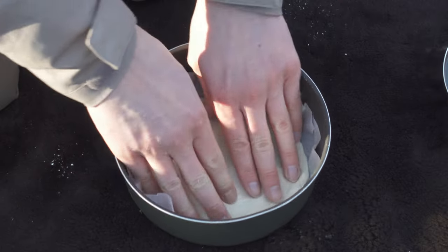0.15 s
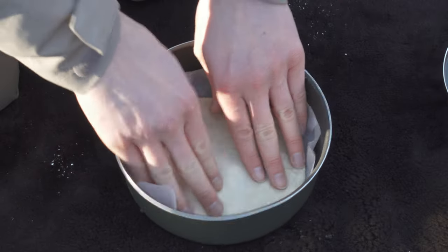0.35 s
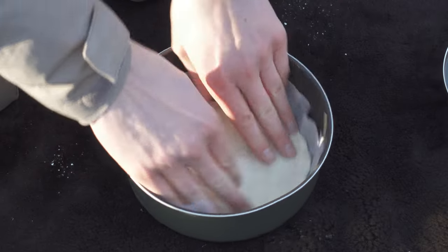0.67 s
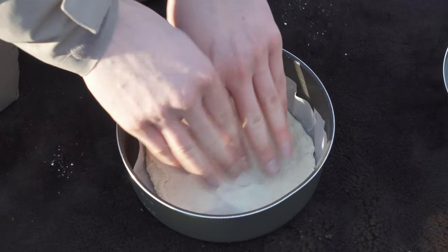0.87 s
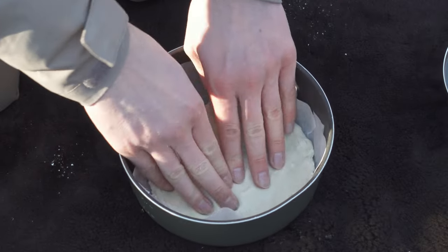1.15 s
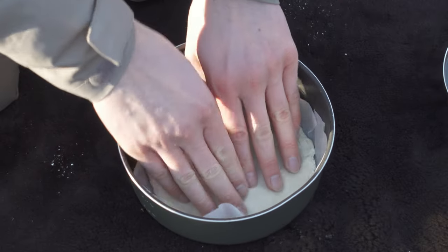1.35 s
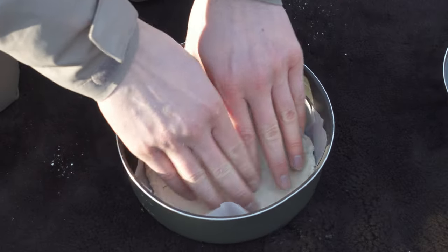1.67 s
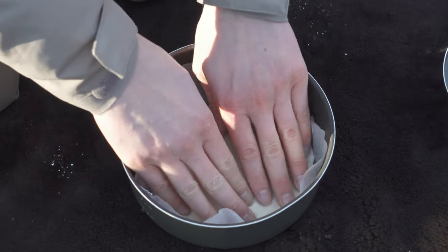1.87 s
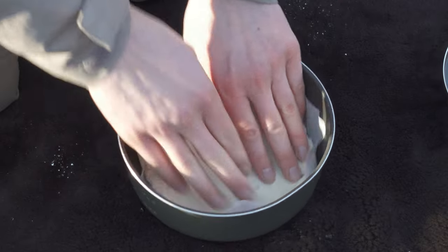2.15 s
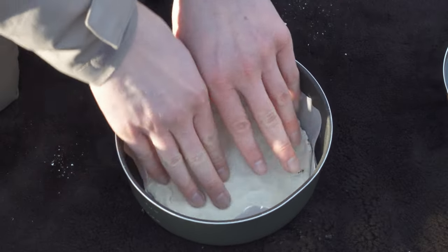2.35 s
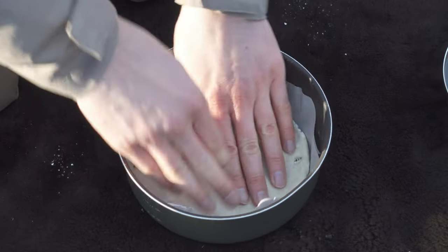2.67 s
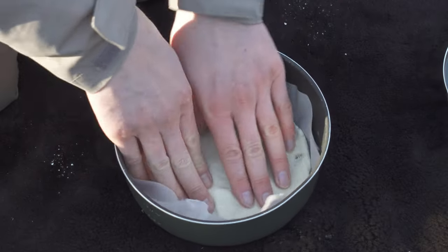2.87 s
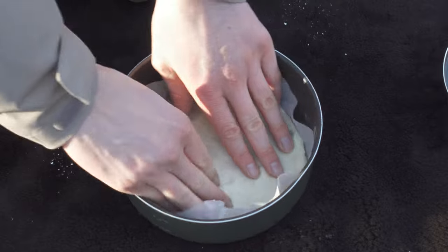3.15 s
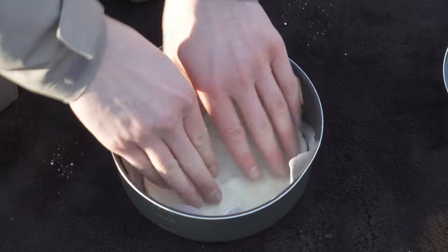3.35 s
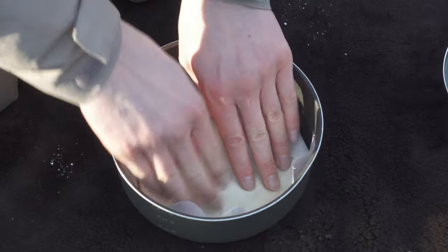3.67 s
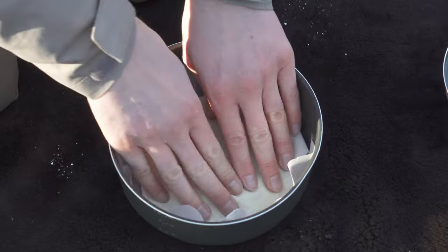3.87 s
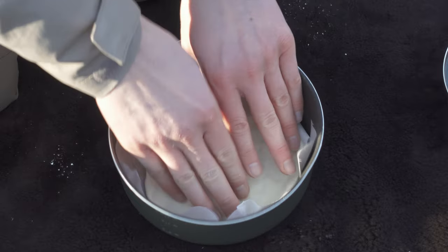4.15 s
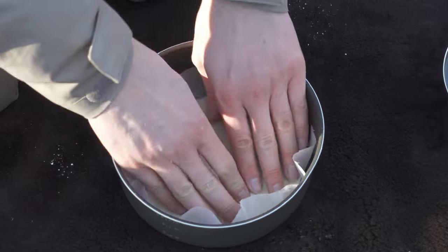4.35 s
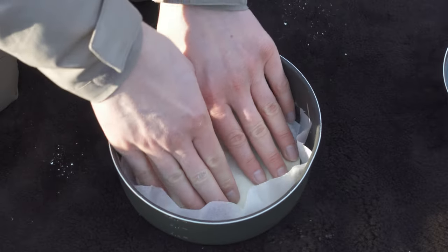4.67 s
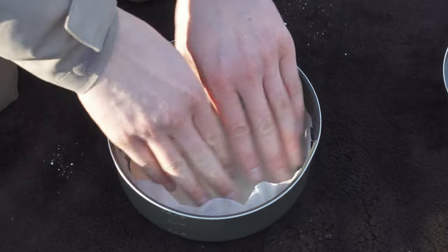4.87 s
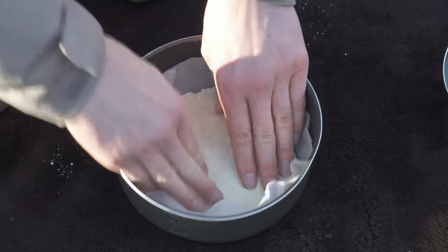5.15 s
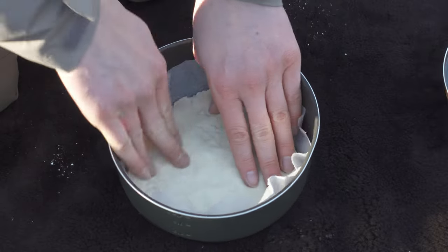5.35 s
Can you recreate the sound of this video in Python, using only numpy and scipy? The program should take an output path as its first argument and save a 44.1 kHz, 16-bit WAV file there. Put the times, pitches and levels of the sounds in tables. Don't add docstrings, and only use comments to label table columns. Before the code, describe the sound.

Baking paper crinkles, flicks and pops inside a shallow tin, giving it a slightly hollow, metallic colour. Early rustling and snaps thin out into quieter movement, one knock stands out around 2.2 seconds, then brisk crackling returns and peaks around five seconds with a heavy short thud. Close, dry, mono outdoor pickup with faint breeze and smooth hiss behind.

```python
import sys
import numpy as np
from scipy import signal
from scipy.io import wavfile
from scipy.ndimage import uniform_filter1d

SR = 44100
rng = np.random.default_rng(int(sys.argv[2]) if len(sys.argv) > 2 else 0)


def master_out(mix):
    frames = np.transpose(np.atleast_2d(mix))
    ceiling = np.clip(frames, -1, 1)
    pcm = np.round(ceiling * 32767).astype(np.int16)
    wavfile.write(sys.argv[1], SR, pcm)


def linear_from_db(decibels):
    return 10 ** (np.asarray(decibels, float) / 20)


N = 243520

# peak t/s, level/dB, rise/(ms per 10 dB), fall/(ms per 10 dB)
PUSHES = [(0.088, -37, 101, 61), (0.266, -35.5, 57, 77), (0.485, -35.5, 63, 62), (0.692, -26, 65, 164),
          (1.309, -51.5, 164, 199), (1.67, -43, 38, 31), (2.204, -31.5, 127, 75), (2.492, -41.5, 156, 61),
          (2.669, -33.5, 63, 35), (2.822, -32.5, 33, 35), (2.982, -32, 50, 36), (3.149, -32, 40, 60),
          (3.29, -30, 67, 19), (3.338, -27.5, 54, 63), (3.615, -41, 104, 39), (3.707, -34, 34, 19),
          (3.89, -44, 72, 142), (4.059, -35, 61, 34), (4.174, -38, 142, 17), (4.241, -36.5, 40, 28),
          (4.55, -30.5, 84, 16), (4.807, -38, 168, 34), (4.912, -25.5, 62, 19), (4.975, -25.5, 33, 65),
          (5.095, -30.5, 22, 30), (0.93, -53.5, 64, 77), (5.245, -27.5, 46, 27), (5.527, -38.5, 167, 202)]
# t/s, level/dB, rise and fall/(ms per 10 dB)
FLICKS = [(0.34, -34, 18), (0.384, -38, 17), (0.438, -33.5, 13), (1.452, -32.5, 17), (1.508, -47, 27),
          (1.549, -49, 20), (1.739, -42, 23), (1.773, -42, 14), (3.404, -23.5, 7), (3.446, -34, 18.5),
          (3.891, -47, 28), (4.393, -33, 30.5), (4.648, -31, 12), (5.055, -19, 13.5), (5.152, -29.5, 23.5),
          (5.357, -42.5, 34)]
# t/s, level/dB, fall/(ms per 10 dB)
RELEASES = [(0.634, -32.5, 107), (1.036, -40.5, 73), (1.865, -40, 70), (1.925, -44, 73), (2.559, -41, 22),
            (2.714, -35.5, 138), (3.029, -33.5, 48), (3.487, -31, 110), (3.744, -39, 67), (4.272, -35, 42),
            (4.325, -35.5, 20), (5.042, -31, 83)]
# t/s, level/dB, rise/(ms per 10 dB)
PULLS = [
    (0.567, -35.5, 18),
    (0.848, -33, 16),
    (2.323, -36.5, 42),
    (4.65, -38, 92),
    (5.472, -39.5, 78),
]
HALTS = [0.153, 0.869, 3.012, 3.412, 3.535, 5.068, 5.298]
# t/s, level/dB
SEATING = [(0, -10.5), (0.3, -9.5), (0.7, -15.5), (1.1, -6.5), (1.65, -17.5), (1.9, -6.5), (2.6, -14),
           (3.05, -6.5), (3.4, -18), (3.8, -7.5), (4.3, -6.5), (4.7, -9), (5.1, -6.5), (5.52, -9.5)]
# t/s, level/dB
CUPPING = [(0, -7), (0.15, -1), (0.3, 3), (0.45, -6), (0.75, 5), (1.0, -14), (1.4, 0), (2.0, -2),
           (2.3, -10), (2.6, -12), (3.0, -10), (3.17, -7), (3.27, 9), (3.39, 0), (3.5, -24), (4.0, -7),
           (4.4, -17), (5.15, 0)]
# f/Hz, density/dB
RUSTLE_SPECTRUM = [(180, -89), (300, -7.5), (535, -7), (808, -6.5), (1510, -4.5), (1870, 1), (2690, 6),
                   (3940, 2), (6360, -3), (8010, -8), (9760, -7), (12100, -3.5), (15500, -12.5)]
# f/Hz, width/Hz, level/dB
HOLLOW = [(826, 233, 8), (1228, 156, 4.5), (1860, 320, -4), (2940, 64, 1), (3670, 94, -15),
          (8160, 1520, 19.5), (12700, 730, -42)]
# f/Hz, width/Hz, share cancelled/1
WALL_DIPS = [(6450, 410, 0.28), (9770, 4900, 0.72)]
# f/Hz, density/dB
AIR_SPECTRUM = [(15, -30), (25, 8), (77, 1), (457, -13), (848, -13.5), (1530, -18.5), (1900, -20.5),
                (3930, -17.5), (8350, -19), (10100, -18), (12800, -21), (15500, -27)]
# t/s, peak/dB, ring f/Hz, treble/dB
CRACKS = [(0.0548, -9.5, 5200, -1), (0.1479, -5.5, 2710, -5.5), (0.4466, -12, 1890, -4),
          (0.4913, -6.5, 1980, -6), (0.5043, -11, 1890, -4), (1.4471, -14.5, 2090, -23),
          (1.8727, -18, 4630, -1), (1.925, -12, 2840, -4), (1.9394, -6.5, 3950, 3), (2.159, -16, 3030, -7),
          (2.176, -14, 7800, 4), (3.278, -8, 3670, -3), (3.4533, -12, 3570, -12), (3.603, -14, 4800, 4),
          (3.632, -17, 4130, 0), (4.0527, -9, 3600, 3), (4.061, -18, 3670, -8), (4.2673, -8.5, 2020, -1),
          (4.28, -13.5, 3230, -15), (4.433, -15, 3600, -11), (4.6744, -7, 4770, 8),
          (5.467, -11.5, 7300, -3), (5.478, -14, 7850, 10), (5.5052, -11, 2060, -10),
          (5.5155, -5, 7700, -9)]
# t/s, peak/dB, ring f/Hz, treble/dB
FULL_SNAPS = [(0.3424, -14, 1900, -14), (0.463, -10, 4570, -6), (0.471, -14, 6570, -13),
              (0.4767, -9.5, 7150, -4), (0.486, -12, 3980, -16), (0.7556, -4.5, 4120, -3),
              (1.038, -22, 2560, -11), (1.8594, -8.5, 1950, -7), (1.864, -8.5, 11800, -3),
              (1.921, -18, 5920, -8), (2.2205, -13.5, 2040, -8), (3.111, -11, 3100, -1),
              (3.485, -7.5, 3520, 0), (3.5172, -6.5, 1980, 13), (3.53, -9.5, 4020, -7),
              (3.6455, -14, 4480, -7), (3.7059, -12, 2050, -11), (4.235, -14, 5000, -1),
              (4.386, -6.5, 8650, -15), (5.042, -4, 2380, -13), (5.114, -12.5, 2280, -22),
              (5.2522, -11, 2100, -3), (5.272, -11.5, 3170, -7), (5.4335, -18, 2070, -8)]
# t/s, peak/dB, ring f/Hz
TICKS = [(0.072, -21, 7300), (0.272, -16.5, 4200), (0.385, -20.5, 4820), (0.537, -15, 6300),
         (0.692, -10, 7100), (0.841, -11, 8900), (2.388, -18, 4760), (2.415, -21, 4470), (3.062, -31, 2220),
         (3.15, -21, 2200), (3.329, -2, 11400), (3.935, -20, 9900), (4.5977, -17, 7400), (4.765, -22, 3700),
         (5.145, -7, 7900)]
# t/s, peak/dB, ring f/Hz, low/dB
CRUNCHES = [(0.6693, -8, 3040, -12), (0.816, -15, 1760, 13), (1.884, -19.5, 6980, 5), (3.017, -23, 2420, 2),
            (3.0794, -30, 2800, 10), (3.264, -18, 2000, 6), (3.286, -11.5, 4370, 1), (3.403, -7, 2840, -17),
            (3.475, -13, 3530, 11), (3.9707, -22, 4450, 4), (4.162, -17.5, 2220, 12),
            (4.399, -15, 2280, -12), (4.6354, -17, 2090, 13), (4.909, -14, 2600, -14),
            (4.928, -16, 3360, 12), (4.9704, -10, 3720, -2), (4.998, -11, 3840, -15),
            (5.0098, -13, 3080, -14), (5.061, -2, 4880, -25), (5.1042, -20, 2500, -3),
            (5.2334, -13.5, 1980, 13), (5.2888, -15.5, 5100, 9)]
# t/s, peak/dB
CLICKS = [
    (0.8665, -9),
    (3.5057, -4),
    (5.0485, -1),
    (5.142, -19),
    (3.4025, 2),
    (1.632, -25),
    (2.862, -25),
    (2.2212, -14),
]
# t/s, peak/dB, ring f/Hz
PIPS = [(0.043, -26, 1800), (0.374, -24, 1900), (1.311, -31, 2400), (1.731, -29, 2190), (1.78, -30.5, 1950),
        (2.057, -28, 1840), (2.46, -24, 2580), (4.21, -26, 2900), (5.156, -12.5, 2430), (5.163, -17, 2550),
        (5.36, -27, 2420), (2.555, -24, 1100), (2.135, -24.5, 1260), (4.531, -29, 2000)]
# t/s, peak/dB, ring f/Hz
SLIPS = [(0.039, -27, 2890), (0.0785, -21, 7880), (0.216, -31, 1200), (0.244, -26, 7700),
         (0.286, -29, 7750), (0.564, -21, 1820), (1.9013, -29, 8440), (1.9043, -27, 8310),
         (1.9482, -35, 2780), (1.9776, -26, 5640), (2.0135, -38, 7800), (2.5054, -26, 7920),
         (2.5373, -29, 2280), (2.6226, -27, 8270), (2.7707, -23, 2760), (3.0788, -14, 2570),
         (3.138, -22, 2040), (3.29, -16, 4400), (3.5016, -20, 8310), (3.7935, -24, 1850),
         (4.207, -29, 1810), (4.23, -24, 4220), (4.696, -27, 8100), (4.7004, -26.5, 4600),
         (4.7563, -37, 7880), (4.9324, -22, 2580), (0.577, -31, 8100), (3.4765, -22, 8250),
         (0.3, -24, 1550), (0.334, -19, 2000), (1.051, -27, 4300), (1.072, -30, 2500), (1.287, -31, 2600),
          (1.55, -25, 3220), (1.652, -29, 3360), (2.0937, -21, 2540), (2.1398, -21, 7800),
          (2.586, -29, 3620), (2.73, -25, 3000), (3.0616, -28, 8550), (3.785, -29, 1340),
          (3.862, -32, 1510), (4.2486, -21, 7880), (4.913, -9.5, 3400), (4.9863, -15, 7880),
          (5.039, -10, 4000), (5.472, -21, 3660), (3.502, -21, 5000)]
# from f/Hz, to f/Hz
SNAP_BANDS_HZ = [(1150, 2600), (2600, 6000), (6000, 15500)]
# f/Hz, width/Hz
TIN_MODES = [(1900, 170), (2470, 150), (2950, 150), (3550, 170), (4080, 170)]
# t/s, peak/dB, low f/Hz, middle f/Hz, high f/Hz
FACETS = [(0.0548, -12, 2900, 3700, 8420), (0.1468, -6, 2640, 4770, 8300), (0.4462, -9, 1990, 5460, 8170),
          (0.4625, -8, 2900, 4580, 8670), (0.4772, -9, 2500, 6030, 7110), (0.4909, -6, 1920, 4500, 7200),
          (0.5037, -21, 1880, 4490, 8090), (0.7559, -5, 1920, 3920, 7700), (0.8413, -6, 1960, 3620, 8430),
          (1.447, -11, 2150, 4400, 7700), (1.8592, -11, 1990, 5500, 7300), (1.8637, -5, 2400, 5760, 7400),
          (1.9264, -8, 2800, 4400, 7300), (1.94, -13, 2770, 4200, 8000), (3.1099, -7, 2950, 3400, 7370),
          (3.278, -9, 1890, 3590, 8400), (3.3303, -9, 2950, 4650, 8500), (3.4035, 0, 2860, 4170, 8260),
          (3.476, -15, 2940, 3570, 8170), (3.485, -6, 2940, 3500, 8220), (3.5167, -9, 2870, 5030, 8000),
          (3.531, -8, 2860, 4900, 7560), (3.7064, -7, 1900, 3930, 7700), (4.0532, -10, 1970, 3620, 8150),
          (4.267, -5, 2050, 6100, 8000), (4.3866, -9, 2970, 5220, 8600), (4.4334, -14, 3300, 3470, 6300),
          (4.6749, 0, 4400, 4950, 8350), (5.042, 1, 2480, 3700, 8300), (5.0614, -7, 3000, 5100, 7800),
          (5.1447, -7, 2460, 4700, 7460), (5.252, -9, 1920, 3400, 7700), (5.289, -18, 2500, 5370, 7370),
          (5.4672, -22, 2030, 3700, 7660), (5.5155, -7, 2270, 5920, 7700)]
FACET_DB = [-13, -12, -14]
FACET_MS = [12, 11, 10]
# t/s, peak/dB, f/Hz, 60 dB decay/s
KNOCKS = [(0.881, -27, 791, 0.0067), (1.266, -35, 390, 0.02), (1.294, -33, 600, 0.016),
          (1.336, -36, 447, 0.02), (1.005, -39, 700, 0.012), (1.36, -38, 500, 0.018),
          (2.2221, -13.5, 794, 0.01), (2.729, -27.5, 415, 0.011), (3.039, -29, 854, 0.069),
          (3.02, -32, 1010, 0.038), (3.261, -33, 830, 0.047), (3.29, -30, 830, 0.038),
          (3.476, -30, 1150, 0.014), (3.486, -30, 900, 0.015), (3.5055, -27, 800, 0.011),
          (3.5171, -24, 1240, 0.012), (3.521, -32, 700, 0.014), (3.53, -31, 750, 0.014),
          (2.2214, -18, 1480, 0.011), (3.403, -27, 1310, 0.016), (3.706, -23.5, 864, 0.037),
          (4.022, -32, 393, 0.024), (4.161, -28, 900, 0.016), (4.266, -28, 865, 0.022),
          (4.922, -28.5, 860, 0.032), (4.977, -22, 836, 0.033), (5.064, -17, 860, 0.0064),
          (5.213, -28, 750, 0.014), (5.275, -24.5, 720, 0.021), (5.294, -24.5, 860, 0.0091)]
# t/s, peak/dB, f/Hz, 60 dB decay/s
THUDS = [
    (1.022, -28.5, 110, 0.018),
    (1.493, -32, 148, 0.038),
    (4.613, -24, 83.4, 0.014),
    (5.039, -5, 134, 0.0058),
]
# t/s, peak/dB, f/Hz, 60 dB decay/s
MORE_KNOCKS = [(0.249, -36, 330, .03), (0.891, -37, 304, 0.025), (1.026, -31.5, 260, 0.026),
               (1.127, -36, 350, .03), (1.501, -35, 230, 0.025), (1.758, -37, 248, 0.027),
               (3.088, -36.5, 377, .03), (3.111, -28.5, 790, .015), (4.103, -34, 350, .03),
               (4.245, -36, 330, 0.035), (4.836, -31, 353, 0.026), (5.038, -15.5, 325, 0.016),
               (0.464, -30, 860, .015), (4.298, -32, 600, 0.016), (3.705, -29, 380, 0.022)]
# start t/s, end t/s, from f/Hz, to f/Hz, level/dB
GROANS = [(3.79, 3.86, 680, 715, -42), (3.858, 3.912, 715, 705, -35), (3.75, 3.92, 1350, 1260, -45),
          (3.79, 3.92, 1580, 1680, -45), (4.07, 4.15, 1700, 1650, -41), (4.04, 4.13, 900, 780, -44),
          (3.43, 3.47, 3700, 3400, -34), (3.72, 3.79, 1800, 1980, -43), (3.92, 3.97, 740, 600, -46),
          (4.15, 4.24, 1850, 1740, -40), (4.0, 4.06, 1620, 1700, -46), (3.425, 3.455, 5500, 4300, -35)]


def rms_one(x):
    return x / np.sqrt(np.mean(x ** 2) + 1e-20)


def in_time(rows):
    s, *columns = np.transpose(rows)
    return [np.interp(np.arange(N) / SR, s, column) for column in columns]


def at_hz(points, hz):
    points_hz, points_db = np.transpose(points)
    return np.interp(np.log(hz), np.log(points_hz), points_db)


def drift(rate_hz):
    r = np.exp(-16 * np.pi * rate_hz / SR)
    noise = rng.standard_normal(N // 8 + 4002)
    slow = signal.lfilter([1], [1, -2 * r, r * r], noise)[4000:]
    return np.interp(np.arange(N) / 8, np.arange(len(slow)), rms_one(slow))


def resonance(x, hz, width_hz):
    r = np.exp(-np.pi * width_hz / SR)
    zeros = np.array([1, 0, -1]) * (1 - r * r) / 2
    poles = [1, -2 * r * np.cos(2 * np.pi * hz / SR), r * r]
    return signal.lfilter(zeros, poles, x)


def band(x, low_hz, high_hz):
    edges_hz = [low_hz, min(high_hz, .45 * SR)]
    return signal.sosfilt(signal.butter(2, edges_hz, "band", fs=SR, output="sos"), x)


def bands(low_hz, per_octave, count):
    edges = low_hz * 2 ** (np.arange(count + 1) / per_octave)
    return zip(edges, edges[1:], np.sqrt(edges[:-1] * edges[1:]))


def hollow(x, lift_db):
    x = x + sum(linear_from_db(lift_db + db) * resonance(x, hz, width_hz) for hz, width_hz, db in HOLLOW)
    for hz, width_hz, share in WALL_DIPS:
        x = x - np.clip(share, 0, 1) * resonance(x, hz, width_hz)
    return x


def strokes():
    let_go_ms, stop_ms = 11, 10
    halt_db_per_ms = 1.5
    body_loss_per_db = 0.4
    rows = [(s, db, rise, fall, 1) for s, db, rise, fall in PUSHES]
    rows += [(s, db, ms, ms, 1) for s, db, ms in FLICKS]
    rows += [(s, db, let_go_ms, fall, 1.5) for s, db, fall in RELEASES]
    rows += [(s, db, rise, stop_ms, 3) for s, db, rise in PULLS]
    s, db, rise_ms, fall_ms, treble_db = np.transpose(rows)[:, :, None]
    t = np.arange(0, N + 32, 32) / SR
    slope_s = np.maximum(np.where(t < s, rise_ms, fall_ms) / 1000, .003)
    away = np.abs(t - s) / slope_s
    halted_ms = sum(1000 * np.maximum(t - halt, 0) * (s < halt) for halt in HALTS)
    power = linear_from_db(2 * (db - 10 * away ** 1.5 - halt_db_per_ms * halted_ms)) + 1e-12
    total = power.sum(axis=0)
    coarse = np.sqrt(total), (power * treble_db).sum(axis=0) / total, (power * db).sum(axis=0) / total
    force, treble_db, effort_db = [np.interp(np.arange(N) / SR, t, c) for c in coarse]
    body_db = in_time(SEATING)[0] - body_loss_per_db * (effort_db + 33)
    return force, treble_db, body_db


def rustle(slips_per_s, spread_db, clump_db, patch_db):
    body_hz, middle_hz, treble_hz = 750, 2900, 9500
    force, treble_db, body_db = strokes()
    spread = linear_from_db(spread_db * np.minimum(rng.exponential(1, (2, N)), 4.5))
    sizes = spread * rng.standard_normal((2, N))
    slips = sizes * (rng.random((2, N)) < slips_per_s / SR)
    out = 0
    for k, (low, high, hz) in enumerate(bands(263.0, 5, count=30)):
        to_body = np.clip(np.log(middle_hz / hz) / np.log(middle_hz / body_hz), 0, 1)
        to_treble = np.clip(np.log(hz / middle_hz) / np.log(treble_hz / middle_hz), 0, 1)
        colour_db = at_hz(RUSTLE_SPECTRUM, hz) + to_body * (body_db + 15.5) + to_treble * treble_db
        lone = np.roll(sizes[k % 2], 997 * k) * (rng.random(N) < 60 / SR)
        pops = linear_from_db(8.5 - 8.0 * to_body) * lone
        out = out + linear_from_db(colour_db + patch_db * drift(19.0)) * band(slips[k % 2] + pops, low, high)
    out = out + linear_from_db(in_time(CUPPING)[0]) * resonance(out, hz=1890, width_hz=120)
    clumps = linear_from_db(1.37 + clump_db * drift(68))
    return force * clumps * rms_one(hollow(out, lift_db=-5.5))


def air(level_db, gust_db):
    white = rng.standard_normal((2, N + SR))
    out = 0
    for k, (low, high, hz) in enumerate(bands(17.26, 3, count=30)):
        lumps_db = gust_db * np.clip(np.log(900 / hz), 0, .9) * drift(9.2)
        out = out + linear_from_db(at_hz(AIR_SPECTRUM, hz) + lumps_db) * band(white[k % 2], low, high)[SR:]
    return linear_from_db(level_db) * rms_one(out)


def creases():
    ring_db = -2.5
    rows = [(s, db, hz, 6, -13, 8.8, 5) for s, db, hz in SLIPS]
    rows += [(s, db, hz, -7, 0, 22, 6) for s, db, hz in PIPS]
    rows += [(s, db, hz, treble_db, -37, 9.9, ring_db) for s, db, hz, treble_db in CRACKS]
    rows += [(s, db, hz, 31.5, 30.5, 14.3, ring_db) for s, db, hz in TICKS]
    rows += [(s, db, hz, treble_db, 3.5, 10, ring_db) for s, db, hz, treble_db in FULL_SNAPS]
    rows += [(s, db, hz, -4.5, low_db, 22.7, ring_db) for s, db, hz, low_db in CRUNCHES]
    rows += [(s, db, 8000, 0, 0, 4.2, -26) for s, db in CLICKS]
    return rows


def snaps(rows, rise_s):
    lead_s, break_s = .00045, .0007
    fold_width = .11
    tin_db, tin_spread_db = -11, 6.5
    bare_ms = 4.2
    out, t = np.zeros(N + 2048), np.arange(2048) / SR
    noises = rng.standard_normal((len(rows), len(t)))
    strengths = rng.standard_normal((len(rows), len(TIN_MODES)))
    stiff_paper = signal.butter(1, 12400, fs=SR)
    for (s, db, hz, treble_db, low_db, decay_ms, ring_db), noise, strength in zip(rows, noises, strengths):
        bare = decay_ms <= bare_ms
        shape = (1 - np.exp(-np.maximum(t - lead_s, 0) / rise_s)) * linear_from_db(-55000 * t / max(decay_ms, 4))
        burst = np.tanh(noise) * shape
        burst[round(break_s * SR)] += (9 if bare else 2.3) * np.sign(noise[0])
        low, middle, treble = (rms_one(band(band(burst, *edges), *edges)) for edges in SNAP_BANDS_HZ)
        sound = linear_from_db(low_db - 10.0) * low + middle + linear_from_db(treble_db + 5.5) * treble
        sound = signal.lfilter(*stiff_paper, sound)
        sound += sum(linear_from_db(tin_db + tin_spread_db * k) * resonance(sound, *mode)
                     for mode, k in zip(TIN_MODES, strength))
        ring = rms_one(resonance(burst, hz, fold_width * hz))
        lift_db = -18.0 if bare else -7.5
        sound = hollow(rms_one(sound) + linear_from_db(ring_db) * ring, lift_db)
        out[round(s * SR):][:len(t)] += linear_from_db(db - 1.9) * sound / np.abs(sound).max()
    return out[:N]


def facets(rise_ms):
    out, t = np.zeros(N + 1024), np.arange(1024) / SR
    phases = rng.uniform(0, 2 * np.pi, (len(FACETS), 3))
    decay = linear_from_db(np.c_[FACET_DB] - 60000 * t / np.c_[FACET_MS])
    shapes = decay * (1 - np.exp(-1000 * t / rise_ms))
    for (s, db, *hz), phase in zip(FACETS, phases):
        modes = shapes * np.sin(2 * np.pi * np.c_[hz] * t + np.c_[phase])
        out[round(s * SR):][:len(t)] += linear_from_db(db) * modes.sum(axis=0)
    return out[:N]


def knocks():
    out, t = np.zeros(N + 4096), np.arange(4096) / SR
    bump = np.exp(-((t - .0005) / 0.00029) ** 2)
    push = -np.gradient(bump) * SR * 0.000089
    for s, db, hz, decay_s in KNOCKS + THUDS + MORE_KNOCKS:
        swing = -np.sin(2 * np.pi * hz * t) * linear_from_db(-60 * t / max(decay_s, .004))
        out[round(s * SR):][:len(t)] += linear_from_db(db + 1.5) * (swing + .5 * push)
    return out[:N]


def groan(grit_hz, sway_db):
    out, t = np.zeros(N), np.arange(N) / SR
    for start, end, from_hz, to_hz, db in GROANS:
        along = np.clip((t - start) / (end - start), 0, 1)
        waver = .06 * (.55 if to_hz < 900 else 1)
        hz = (from_hz + (to_hz - from_hz) * along) * (1 + waver * drift(grit_hz))
        level = linear_from_db(db + sway_db * drift(grit_hz)) * np.sqrt(np.abs(np.sin(np.pi * along)))
        out += level * np.sin(2 * np.pi * np.cumsum(hz) / SR)
    return out


def scene():
    paper = rustle(slips_per_s=9000, spread_db=3.0, clump_db=1.4, patch_db=2.0)
    wood = air(level_db=-43, gust_db=2.0)
    breaks = snaps(creases(), rise_s=0.000073) + facets(rise_ms=.16)
    tin = knocks() + groan(grit_hz=110, sway_db=3.5)
    return (paper + wood + breaks + tin)[None]


def steep_low_pass(x, hz):
    return signal.sosfiltfilt(signal.ellip(8, .2, 40, hz, fs=SR, output="sos"), x)


def cut(x, hz, top_hz, jump_db, top_db):
    low = steep_low_pass(x, hz)
    top = steep_low_pass(x, top_hz) - low
    power = x ** 2
    jumps = uniform_filter1d(power, size=64) > linear_from_db(2 * jump_db) * uniform_filter1d(power, size=2048)
    gate = np.minimum(uniform_filter1d(1. * jumps, size=256) * 8, 1)
    return low + linear_from_db(top_db) * top * gate


def low_pass(x):
    return signal.sosfilt(signal.butter(12, 16660, fs=SR, output="sos"), x)


def record(dry):
    heard = signal.sosfilt(signal.butter(2, 32, "high", fs=SR, output="sos"), dry)
    mix = cut(np.clip(heard, -1, 1), hz=15720, top_hz=16600, jump_db=10.5, top_db=5)
    return low_pass(mix)


dry = scene()
out = record(dry)
master_out(out)
```